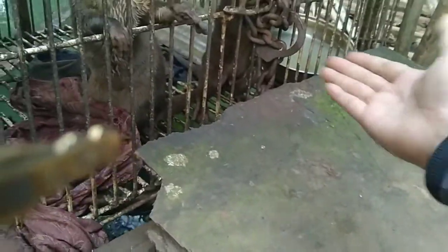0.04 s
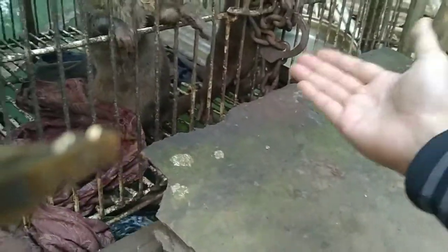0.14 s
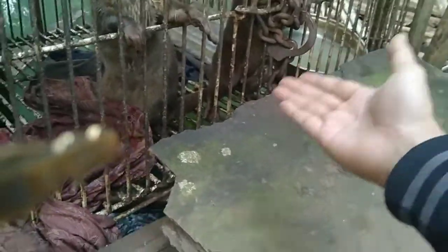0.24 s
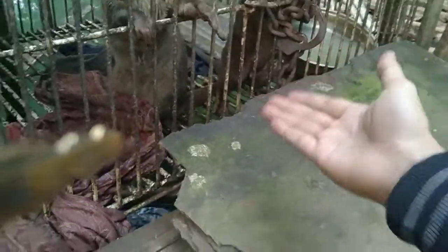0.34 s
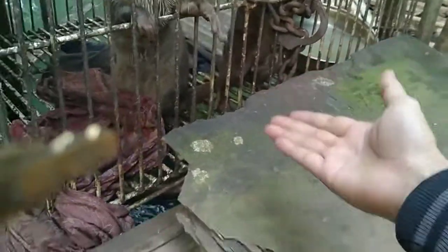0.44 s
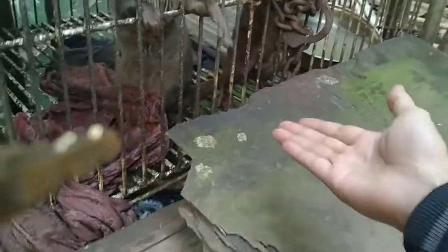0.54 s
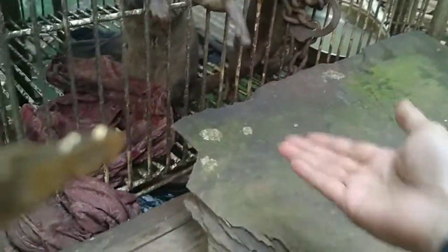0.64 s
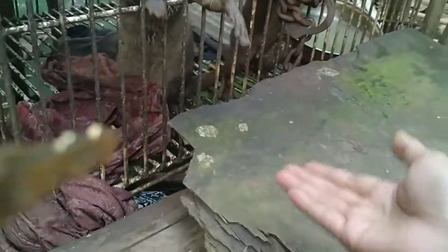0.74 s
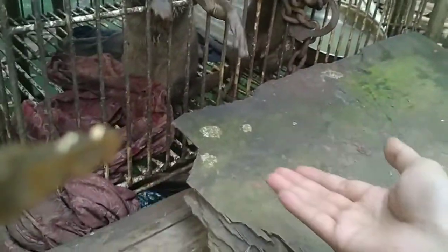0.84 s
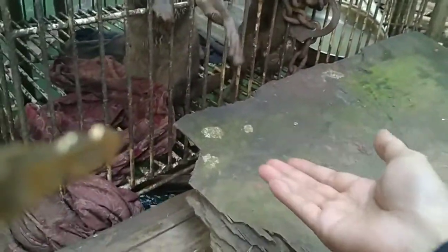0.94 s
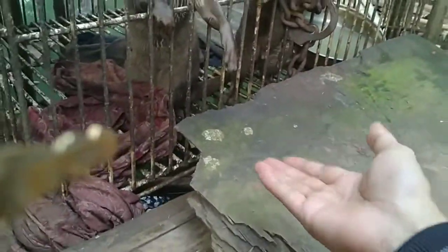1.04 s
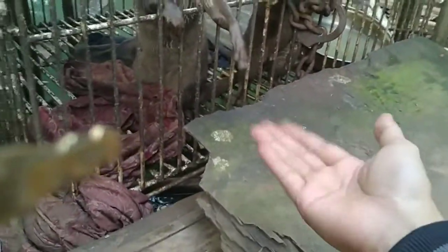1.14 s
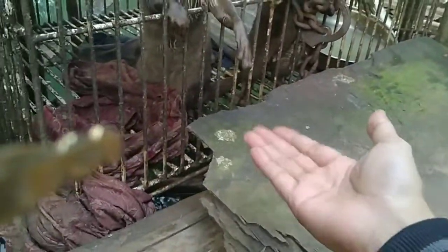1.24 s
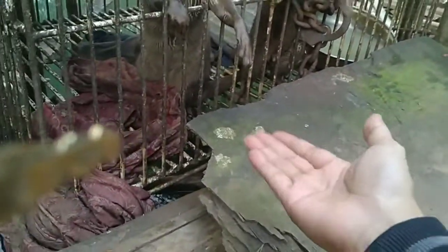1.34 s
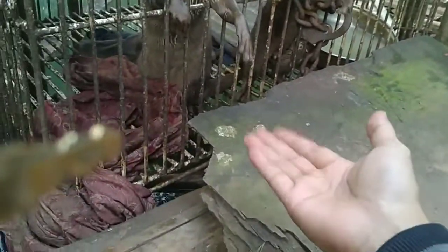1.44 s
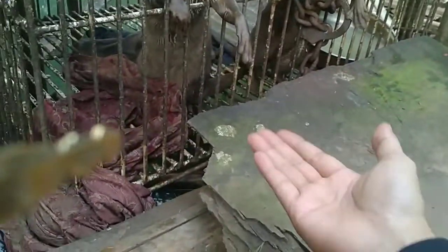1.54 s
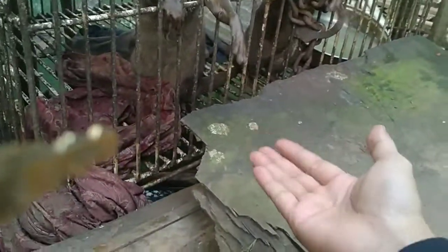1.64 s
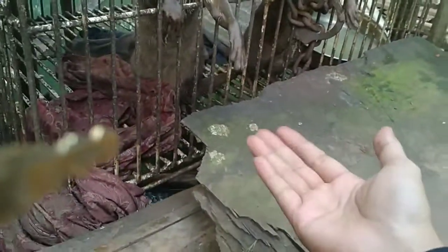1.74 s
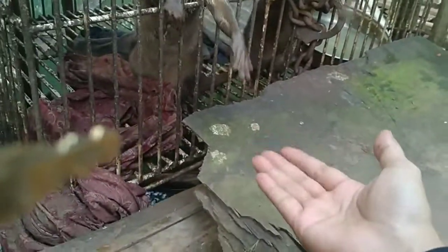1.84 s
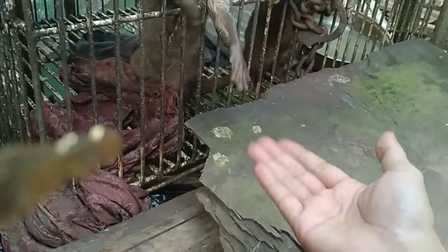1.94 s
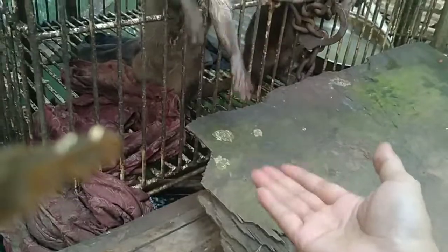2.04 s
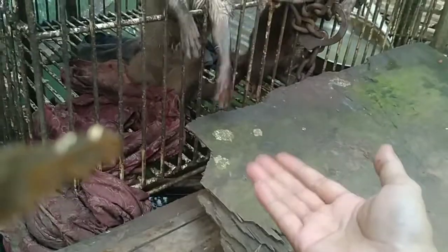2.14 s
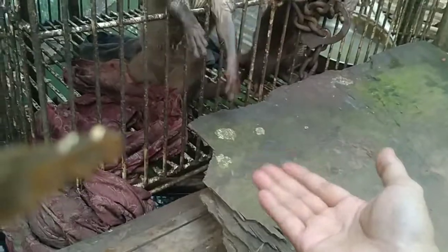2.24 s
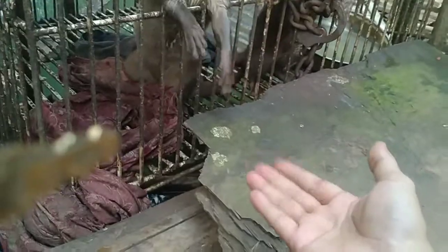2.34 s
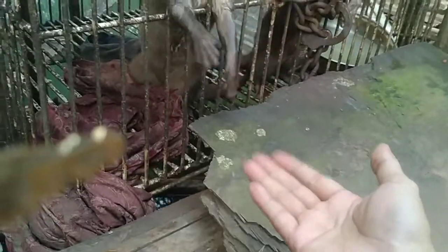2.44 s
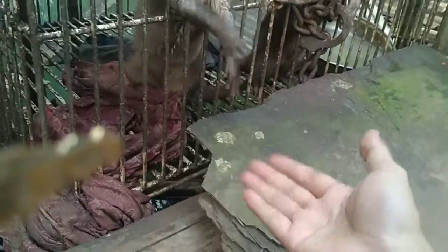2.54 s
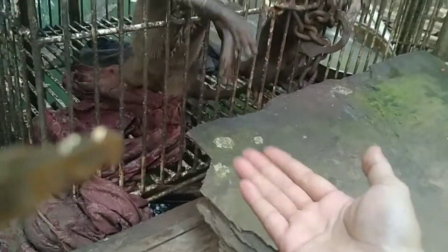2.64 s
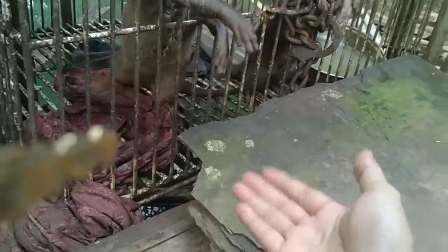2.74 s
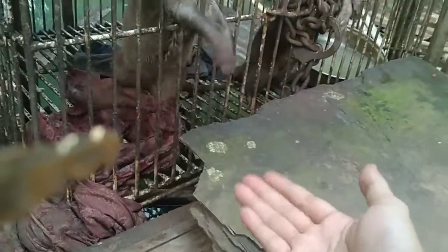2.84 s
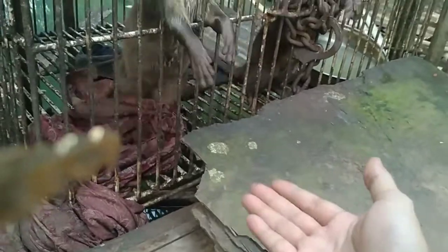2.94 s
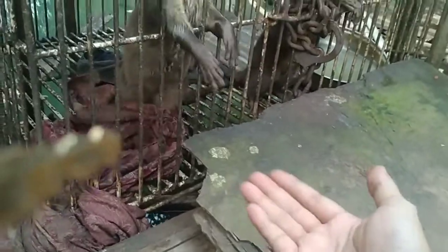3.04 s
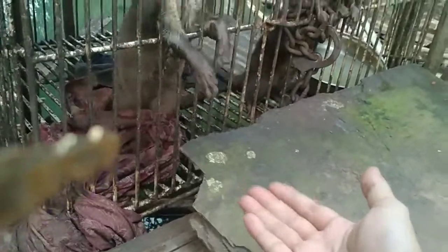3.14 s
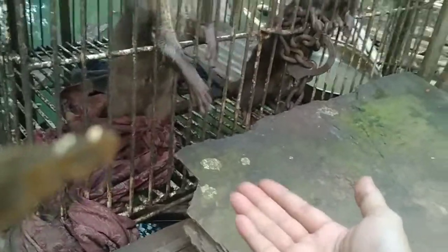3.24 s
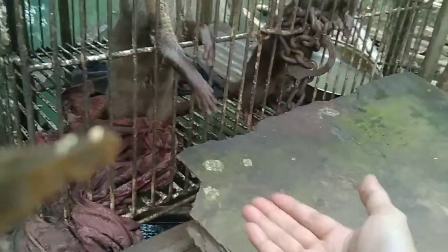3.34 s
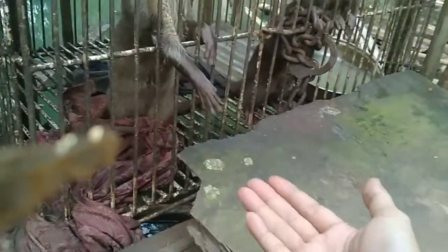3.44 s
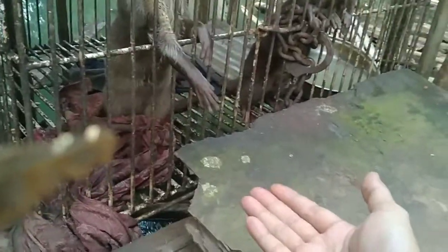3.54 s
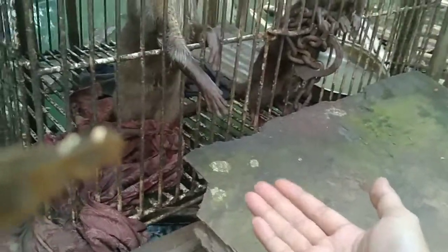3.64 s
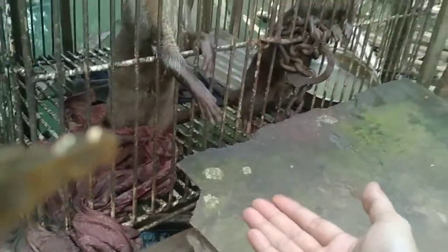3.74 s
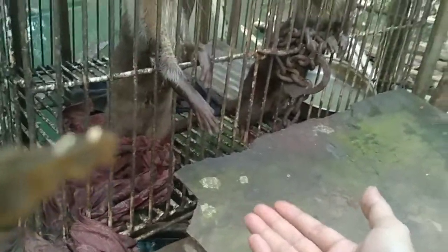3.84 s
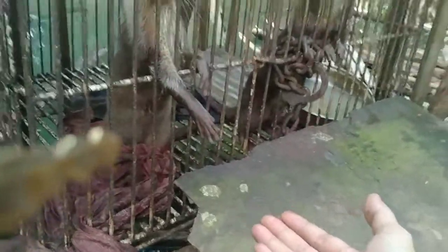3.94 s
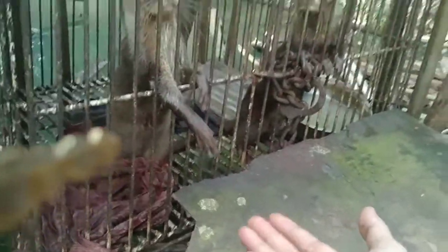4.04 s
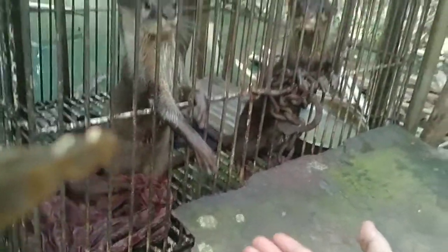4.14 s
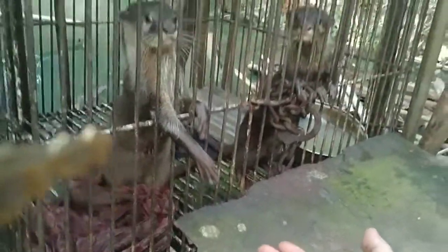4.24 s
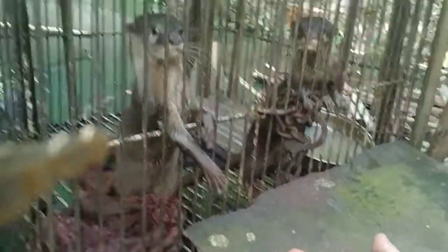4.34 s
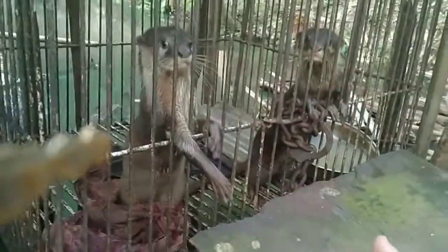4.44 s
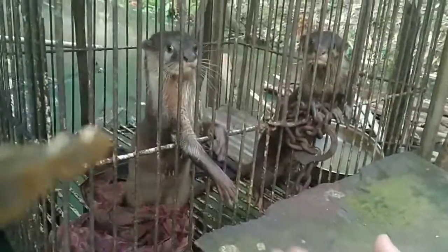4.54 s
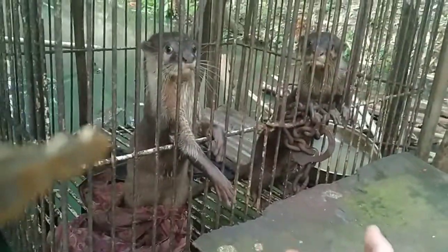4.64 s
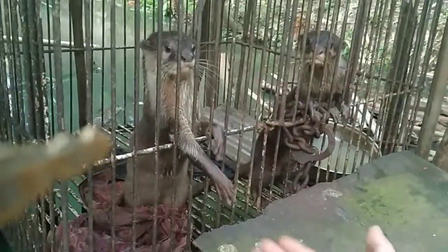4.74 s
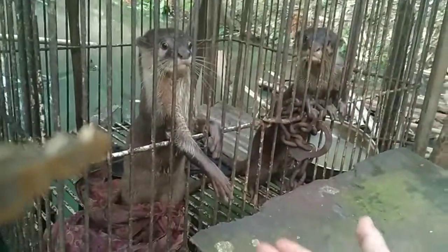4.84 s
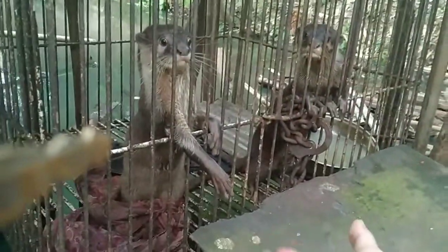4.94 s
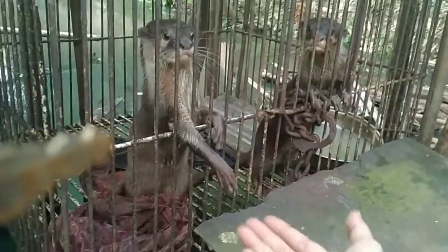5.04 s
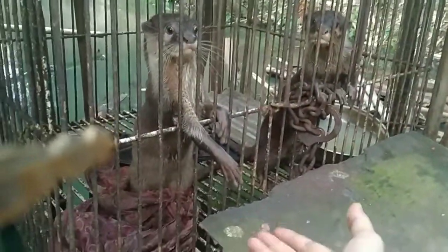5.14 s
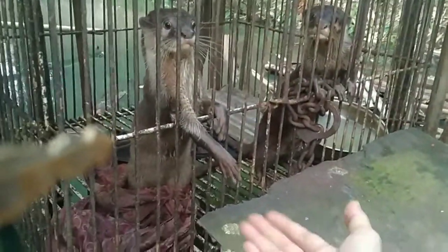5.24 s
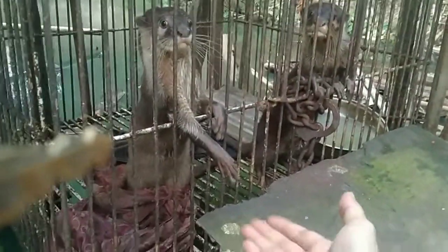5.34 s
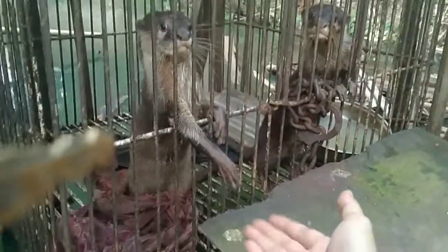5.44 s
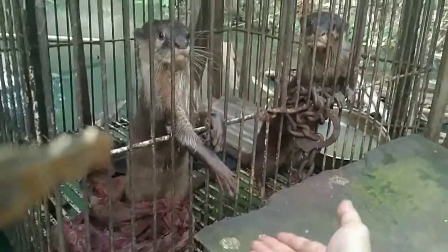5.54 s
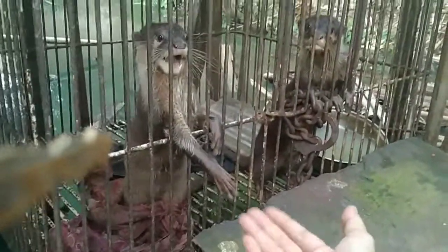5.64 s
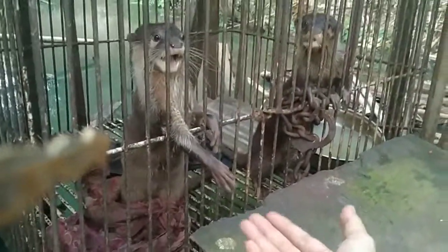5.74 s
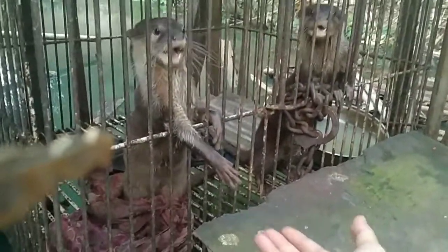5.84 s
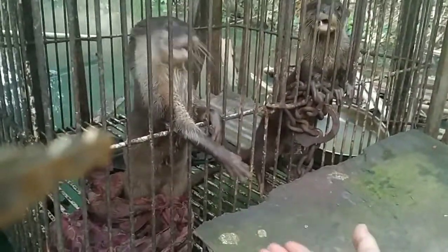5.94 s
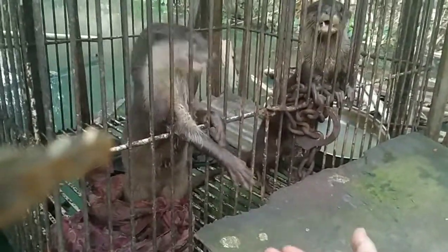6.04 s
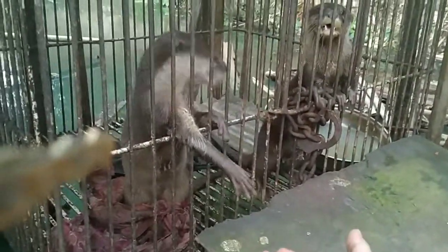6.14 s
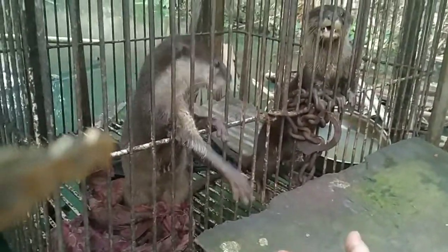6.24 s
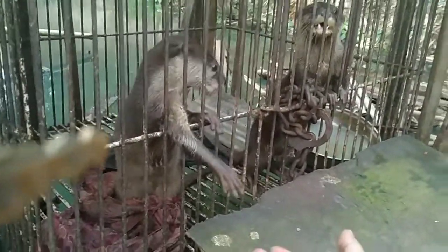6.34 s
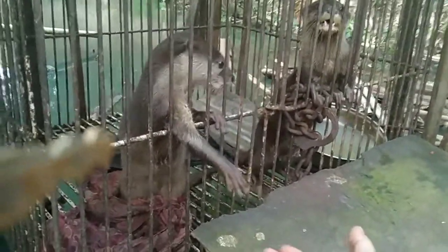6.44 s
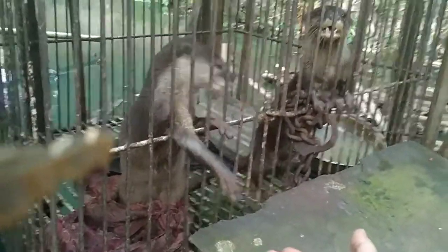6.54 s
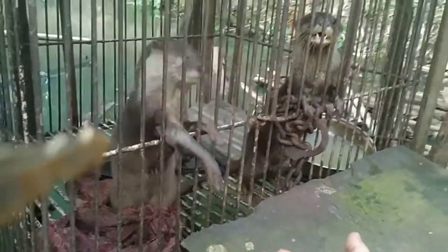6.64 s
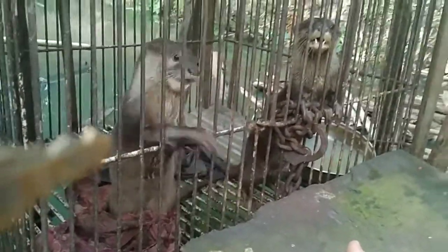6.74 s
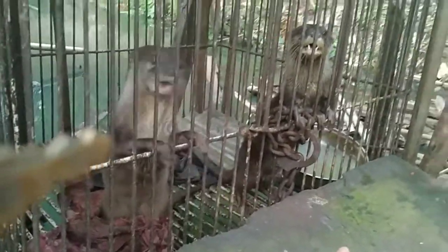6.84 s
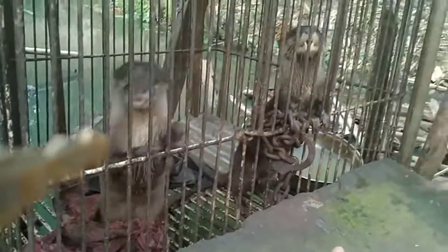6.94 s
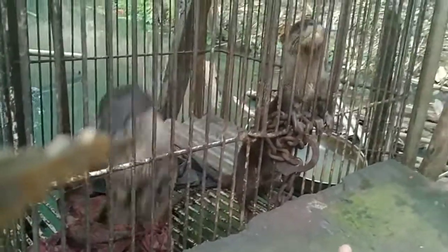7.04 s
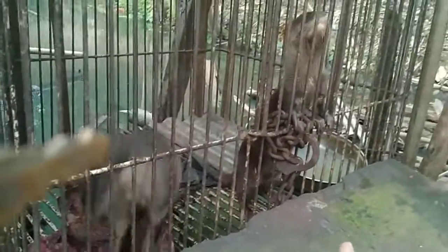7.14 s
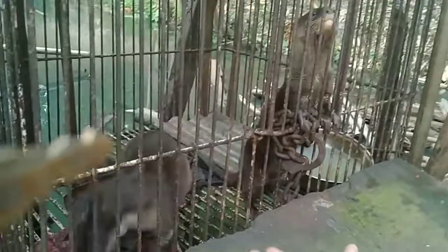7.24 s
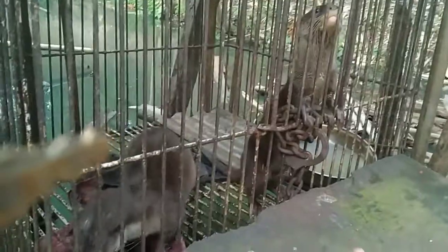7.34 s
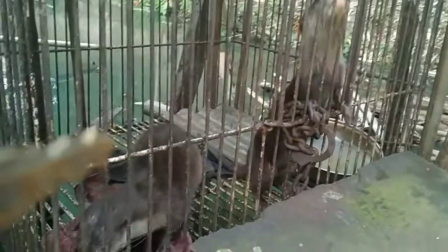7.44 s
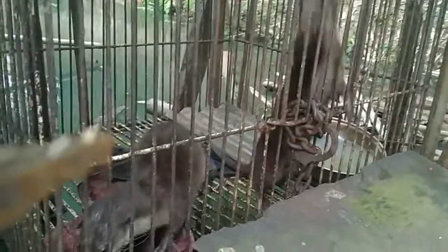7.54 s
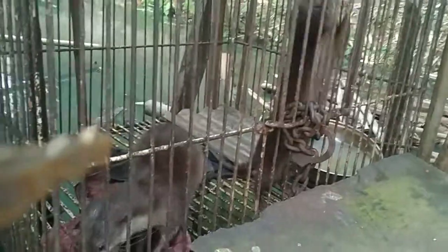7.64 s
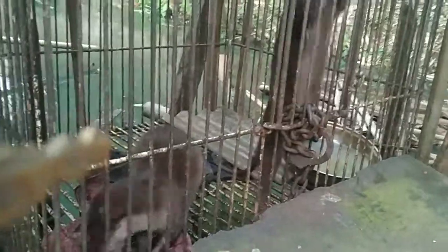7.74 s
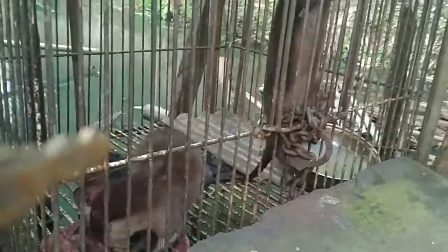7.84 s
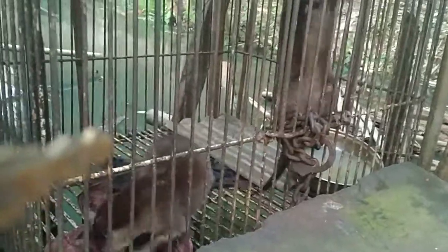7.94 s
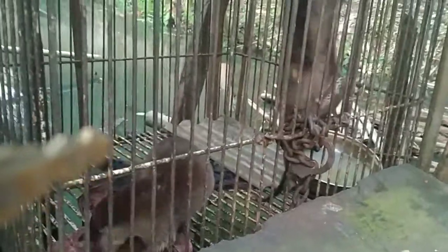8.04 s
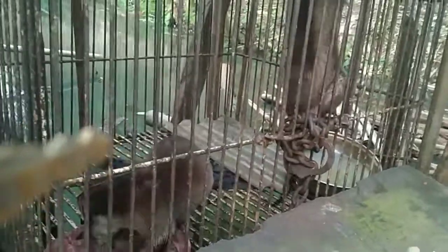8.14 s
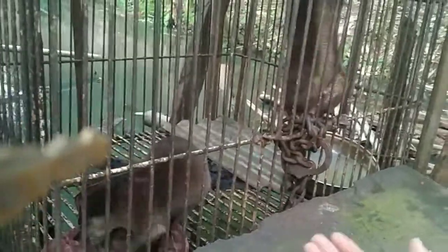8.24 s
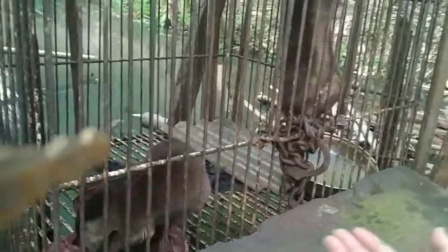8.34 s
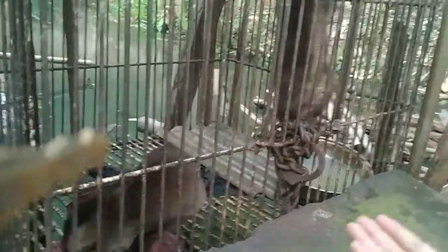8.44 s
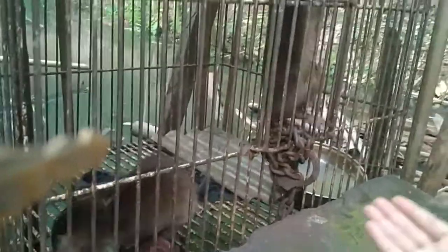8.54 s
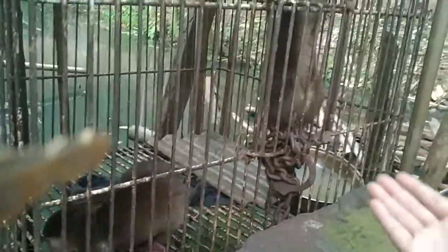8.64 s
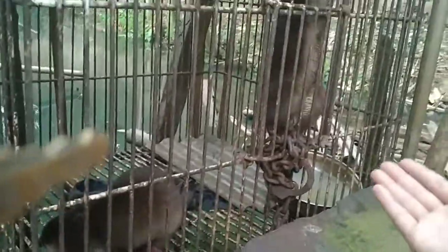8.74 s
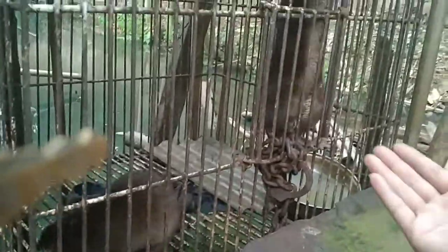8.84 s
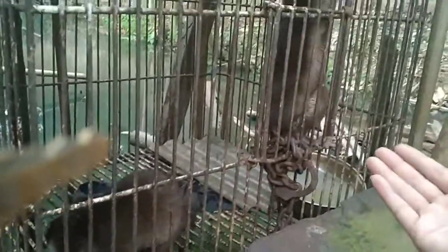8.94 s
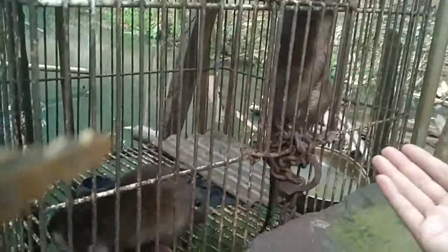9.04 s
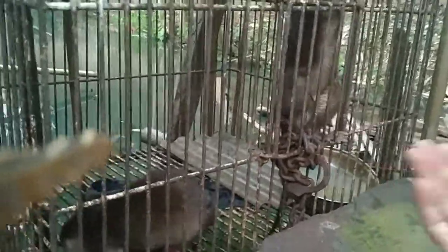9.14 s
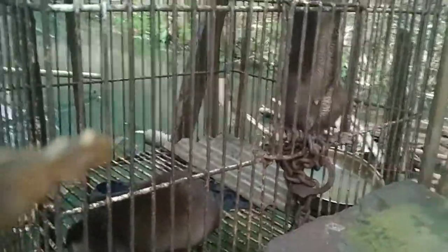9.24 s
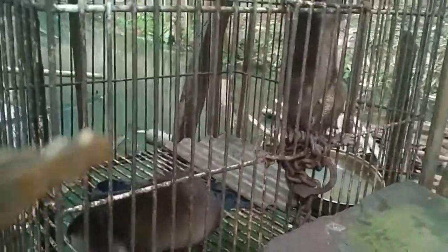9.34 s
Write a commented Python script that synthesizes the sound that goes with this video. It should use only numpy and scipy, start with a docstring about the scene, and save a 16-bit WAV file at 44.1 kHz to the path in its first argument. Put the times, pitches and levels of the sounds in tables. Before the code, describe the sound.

Two caged otters squeal close to the microphone outdoors. Shrill, slightly hoarse calls, most opening with a short whistle, lead to one long wavering squeal. After a quiet gap with faint distant chirps and a light claw tap on the bars, more squeals follow with softer, lower whines. A quick falling whistle and a small snort come near the end, over a low rumble and thin hiss.

```python
"""Shrill squeals, most opening with a whistle, come from two caged otters outdoors, close by and in mono.
Softer low whines, falling notes, a snort, a claw tap and far chirps sound over a low rumble and thin hiss.
Squeals and whines follow the source-filter principle: vocal-fold pulses excite the resonances of a throat.
Whistles and chirps are gliding tones, breath is filtered noise, and walls and cages add a short echo."""
import sys
import numpy as np
from scipy import signal
from scipy.fft import rfft, irfft
from scipy.io import wavfile
from scipy.ndimage import uniform_filter1d

SR = 44100
rng = np.random.default_rng(int(sys.argv[2]) if len(sys.argv) > 2 else 0)


def unload_audio(sound):
    """Save the sound as a 16-bit wav file, at the path given as the first command line argument."""
    columns = np.transpose(np.atleast_2d(sound))
    # keep every value between -1 and 1, then stretch to whole-number steps
    steps = np.round(np.clip(columns, -1, 1) * 32767)
    wavfile.write(sys.argv[1], SR, steps.astype(np.int16))


N = 413658
BAND_LIMIT_HZ = 15950

# resonances of the open throat: frequency_hz, gain_db
OPEN_THROAT = [(700, -36.5), (1150, -21), (1650, -28.5), (2300, -9), (3400, -0.5), (4600, 2.5), (5250, -12),
               (5800, -10.5), (7000, -11.5), (8200, -3.5), (10400, -21), (13000, -19), (15900, -16.5)]


def squeal(contour, overshoot_hz, settle_s, base_rasp_db, hum_db):
    """Source and filter: a high voice cracks and glides down to pitch; the mouth's opening colours it."""
    # hoarse stretches: start_s, end_s, first_db, last_db
    hoarse_spans = [(0.672, 0.926, -13.5, -8), (1.727, 1.824, -10, -35), (2.138, 2.232, -21, -20)]
    # mouth and timbre: time_s, opening_share, second_partial_db, treble_db
    mouth_shapes = [(.02, 0.25, -4.5, 1), (.6, 0.64, 0, -2), (.72, 0.25, -13.5, 8.5), (.9, 0.24, -10, 1.5),
                    (1.7, 1, 0, 1), (1.95, 0.46, -2.5, 4.5), (2.25, 0.53, -8, 2.5), (2.42, 1, 5.5, -1),
                    (2.78, 1, 0.5, -0.5), (2.97, 0.29, 9, 3.5), (5.74, 1, -4, -3), (6.0, 0.45, -7.5, -2),
                    (6.1, 0.26, -2.5, -5.5), (6.9, 0.78, 7, -4)]
    # change of resonance as the mouth narrows: frequency_hz, gain_db
    narrowing = [(1150, 2), (2850, 16.5), (3400, 12.5), (4600, -3), (8200, -11.5)]
    crack_s, close_s, gulp_s = .0023, .018, .005
    t, hz, level_db = curves(contour)
    age, to_end = t - t[0], t[-1] - t
    closing = np.clip(1 - to_end / close_s, 0, 1)
    hz = hz + overshoot_hz * (np.exp(-(age / settle_s) ** 1.5) + .8 * np.exp(-age / crack_s))
    hz *= 1 - .06 * np.minimum(closing * 5, 1)  # the pitch drops as the mouth shuts
    gulp = np.exp(-((to_end - close_s - gulp_s) / gulp_s) ** 2)
    level_db = level_db - 4 * gulp - 19 * closing + drift(len(t), span=330)
    rasp_db = np.full(len(t), float(base_rasp_db))
    for start, end, first_db, last_db in hoarse_spans:
        rasp_db = np.maximum(rasp_db, np.interp(t, [start, end], [first_db, last_db], -99, -99))
    rasp_db = uniform_filter1d(rasp_db, size=600)
    onset_rasp_db = (overshoot_hz > 1) * 13 * np.exp(-age / .03)  # the voice frays as it starts and stops
    rasp_db = np.minimum(rasp_db + (-4 - rasp_db) * closing + onset_rasp_db, 0)
    pair_db = np.where((t > 1.785) & (t < 1.824), -8.5, -99)  # brief period doubling
    _, opening, second_db, treble_db = curves(mouth_shapes, t)
    voice = vocal_folds(hz, rasp_db, pair_db, wobble=.0047, fade_db=4.2,
                        second_db=second_db, treble_db=treble_db)
    narrow_throat = [(f, db + spectrum_at(narrowing, f)) for f, db in OPEN_THROAT]
    call = opening * vocal_tract(OPEN_THROAT, *voice) + (1 - opening) * vocal_tract(narrow_throat, *voice)
    shutting = np.exp(-((to_end - .015) / .0085) ** 2)  # the closing mouth hums the fundamental
    return gain_of(level_db) * call + gain_of(hum_db) * shutting * np.sin(phase_of(hz))


def vocal_folds(hz, rasp_db, pair_db, wobble, fade_db, second_db=0, treble_db=0):
    """Harmonic pulse train: jitter and shimmer roughen it, and strong-weak pairs add a subharmonic."""
    waver = drift(len(hz), span=230) + .4 * drift(len(hz), span=40)
    turns = np.cumsum(hz * (1 + wobble * waver)) / SR
    cycle = np.round(turns).astype(int)
    shimmer, jitter = np.diff(rng.standard_normal((cycle[-1] + 3, 2)), axis=0).T / np.sqrt(2)
    jittered = turns + .03 * gain_of(rasp_db) * np.interp(turns, np.arange(len(jitter)), jitter)
    k = np.arange(1, 32)[:, None]
    partials_hz = k * hz
    fading = np.array([drift(len(hz) // 64 + 1, span=22) for _ in k]).repeat(64, axis=1)[:, :len(hz)]
    fading_db = np.minimum(k * .7, fade_db) * fading  # overtones come and go as the head turns
    sizes = gain_of(fading_db + second_db * (k == 2) + treble_db * (abs(partials_hz - 7500) < 2500))
    sizes = uniform_filter1d(sizes, size=200)
    sizes *= np.clip((BAND_LIMIT_HZ + 1000 - partials_hz) / 500, 0, 1)
    pulses = (sizes * np.cos(2 * np.pi * k * jittered)).sum(0)
    pulses *= 1 + gain_of(rasp_db) * shimmer[cycle] + gain_of(pair_db) * (-1.) ** cycle
    return pulses, partials_hz, sizes


def vocal_tract(throat, pulses, partials_hz, sizes):
    """Formant filtering, scaled so that the level stays even as pitch and overtones move."""
    power = ((sizes * gain_of(spectrum_at(throat, partials_hz))) ** 2).sum(0) / 2
    return resonate(pulses, throat) / np.sqrt(power)


def whistle(hz, first_db, second_db):
    """A near-pure tone with three overtones flutters by random frequency and amplitude modulation."""
    phase = phase_of(hz * (1 + .01 * drift(len(hz), span=75)))
    tone = gain_of(first_db) * np.sin(phase) + gain_of(second_db) * np.sin(2 * phase)
    tone += gain_of(second_db - 20) * np.sin(3 * phase) * (3 * hz < BAND_LIMIT_HZ)
    tone += gain_of(second_db - 10) * np.sin(4 * phase) * (4 * hz < BAND_LIMIT_HZ)
    return np.sqrt(2) * tone * gain_of(1.3 * drift(len(hz), span=120))


def opening_whistle(length, overshoot_hz, first_hz, last_hz, db, sag_db, second_db, broken_s):
    """Pitch break: a whistle snaps onto its note, brightens, droops and frays, then jumps down a step."""
    rise_s, overshoot_s, plunge_s, broken_hz = .0043, .0042, .017, 2900
    t = np.arange(0, length, 1 / SR)
    plunge = np.clip(1 - (length - broken_s - t) / plunge_s, 0, 1) ** 2
    hz = np.linspace(first_hz, last_hz, len(t)) + overshoot_hz * np.exp(-t / overshoot_s)
    hz *= 1 - .21 * plunge
    hz = uniform_filter1d(np.where(t > length - broken_s, broken_hz, hz), size=50)
    hiss = gain_of(db - 32 + 10 * plunge) * unit_rms(resonate(rng.standard_normal(len(t)), OPEN_THROAT))
    swell_db = 8 * (np.minimum(t / (length - plunge_s), 1) - 1 - 2 * plunge)
    fray_db = 3.5 * plunge * drift(len(t), span=40)
    tone = whistle(hz, db + sag_db * t / length + fray_db, second_db + swell_db)
    return np.minimum(t / rise_s, 1) * (tone + hiss)


def whine(start, length, first_hz, turn_hz, last_hz, turn, db, slope_db,
          rasp_db, chest_db, ring_db, treble_db):
    """Mixed excitation: a low soft voice that bends once shares the throat's resonances with breath."""
    # resonances of the whining throat: frequency_hz, gain_db
    soft_throat = [(400, -62), (580, -16), (1150, -15.5), (1750, -14), (2250, -8.5), (2800, 9), (3650, -14),
                   (4150, -9), (4900, -36), (5750, -12.5), (6900, -28), (8400, -15.5), (9600, -30.5),
                   (15900, -38)]
    # catches in the voice, where pitch and level dip: time_s
    catch_times = [6.408, 6.435, 6.478, 6.575, 6.614, 6.674]
    rise_s, fall_s, catch_s = .031, .03, .009
    t = np.arange(0, length, 1 / SR)
    after_turn = np.clip((t / length - turn) / (1 - turn), 0, 1)
    hz = np.interp(t, [0, turn * length], [first_hz, turn_hz])
    hz += (last_hz - turn_hz) * (1 - (1 - after_turn) ** 1.8)
    catch = sum(np.exp(-((start + t - s) / catch_s) ** 2) for s in catch_times)
    hz *= 1 + .011 * drift(len(t), span=300) - .055 * catch
    level = gain_of(db - 4 * catch + slope_db * t / length)
    level *= np.clip(np.minimum(t / rise_s, (length - t) / fall_s), 0, 1)
    rasp_db = rasp_db + 5.5 * (.5 - t / length)  # the hoarseness clears along the whine
    throat = [(f, gain_db + chest_db * (f < 2000) + ring_db * (2500 < f < 3200) + treble_db * (f > 4000))
              for f, gain_db in soft_throat]
    source = vocal_folds(hz, rasp_db, pair_db=-59, wobble=.1 * gain_of(rasp_db), fade_db=1)
    return level * (vocal_tract(throat, *source) + gain_of(rasp_db) * breath(len(t), throat))


def falling_note(length, first_hz, last_hz, loudest, db, second_db):
    """A husky whistle falls and swells once; at low pitch, modulation breaks it into stepped bursts."""
    stutter_hz, stutter_below_hz = 88, 4100
    progress = np.linspace(0, 1, round(length * SR))
    swell_db = np.interp(progress, [0, loudest, 1], [-9, 0, -7.5])
    burst_phase = np.pi * stutter_hz * length * (progress - loudest)
    hz = first_hz + (last_hz - first_hz) * progress
    broken = np.clip((stutter_below_hz - hz) / 1000, 0, 1)
    hz *= 1 + .035 * broken * np.sin(2 * burst_phase)  # each burst clings to its pitch
    swell_db += -15 * broken * np.sin(burst_phase) ** 4 + 2 * progress * drift(len(hz), span=76)
    hiss = gain_of(db - 21) * unit_rms(resonate(rng.standard_normal(len(hz)), OPEN_THROAT))
    return gain_of(swell_db) * (whistle(hz, db, second_db) + hiss)


def breath(count, throat):
    """Turbulence: bright noise takes on the resonances of a throat."""
    return unit_rms(resonate(np.diff(rng.standard_normal(count + 1)), throat))


def sigh(db):
    """Spent air hisses through the open throat after a squeal, with exponential decay."""
    t = np.arange(9000) / SR
    return gain_of(db - 170 * t) * breath(len(t), OPEN_THROAT)


def puff(db):
    """Pressure pulse: breath hits the microphone as a blunt pop with a slower thump behind it."""
    pop_s, thump_s = .0005, .004
    age = np.maximum(np.arange(2500) / SR - .003, 0) / np.array([[pop_s], [thump_s]])
    return gain_of(db) * (np.e * age * np.exp(-age) * (1 - age / 2)).sum(0)


def snort(length, db):
    """Sputtering turbulence excites the nose, whose resonances sink as the nostrils relax."""
    # nasal resonances before the slowed playback lowers them: frequency_hz, gain_db
    nose = [(2200, -21), (3200, -1), (3800, 1.5), (4500, -25), (6400, -0.5), (7500, -9), (9000, -10.5)]
    rise_s, fall_db_per_s = .01, 310
    t = np.arange(0, length, 1 / SR)
    air = resonate(rng.standard_normal(len(t)) * gain_of(1.8 * drift(len(t), span=32)), nose)
    slowing_index = np.cumsum(.72 + .27 * np.exp(-(t / .024) ** 2))
    level = np.clip(.5 + t / rise_s, 0, 1) * gain_of(db - fall_db_per_s * np.maximum(t - rise_s, 0))
    return level * unit_rms(np.interp(slowing_index, np.arange(len(t)), air))


def claw_tap(db):
    """Damped free vibration: a claw sets the cage bars ringing."""
    # mode of the bars: frequency_hz, t60_s
    bar_modes = [(1670, 0.11)]
    t = np.arange(6000) / SR
    return sum(gain_of(db - 60 * t / t60) * np.sin(2 * np.pi * hz * t) for hz, t60 in bar_modes)


def chirp(length, first_hz, last_hz, db):
    """A sine glide with one pitch jump swells late; random modulation makes it husky."""
    progress = np.linspace(0, 1, round(length * SR))
    glide = .75 * progress + .25 * (progress > .4)
    hz = first_hz * (last_hz / first_hz) ** glide * (1 + .03 * drift(len(glide), span=18))
    swell = np.sin(np.pi * progress ** 1.4) * gain_of(db + 3 * drift(len(hz), span=80))
    return swell * np.sin(phase_of(hz))


def yard_echo(x, t60_s=.2):
    """Reverberation: sparse reflections of random sign from walls and cages decay exponentially."""
    reflections = np.zeros(20000)
    slots = np.arange(200, 19980, 20)
    reflections[slots + rng.integers(0, 20, len(slots))] = rng.choice([-1., 1.], len(slots))
    tail = reflections * gain_of(-60 * np.arange(len(reflections)) / SR / t60_s)
    return signal.oaconvolve(x, tail / np.linalg.norm(tail))[:N]


def background():
    """Broadband outdoor noise lies under three narrow bands: a wavering hum, a far drone, an insect."""
    # spectrum of the outdoor noise: frequency_hz, relative_db
    air_spectrum = [(66, -3), (488, -19.5), (1040, -18.5), (2100, -24.5), (4350, -36.5), (5250, -42),
                    (8310, -36), (11500, -44.5), (15900, -35)]
    # levels of the low rumble: time_s, hum_db, drone_db
    rumble_levels = [(3.1, -53, -63.5), (6.1, -45.5, -68), (7.9, -47.5, -67), (8.8, -48.5, -54)]
    frames, hz = N // 256 + 5, np.fft.rfftfreq(1024, 1 / SR)
    real, imag, patches = rng.standard_normal((frames, 513, 3)).T
    patches_db = unit_rms(uniform_filter1d(uniform_filter1d(patches, 8, 0), 20, 1))
    spectra = (real + 1j * imag) * gain_of(spectrum_at(air_spectrum, hz)[:, None] + patches_db)
    air = gain_of(-49) * unit_rms(signal.istft(spectra, nperseg=1024, noverlap=768)[1][:N])
    t, hum_db, drone_db = curves(rumble_levels, np.arange(N) / SR)
    hum = gain_of(hum_db) * band_noise(hz=58, width_hz=6)
    drone = gain_of(drone_db) * band_noise(hz=190, width_hz=120)
    insect = gain_of(-74) * (t > 3.5) * (t < 5.2) * band_noise(hz=4294, width_hz=84)
    return air + hum + drone + insect


def band_noise(hz, width_hz):
    """Narrowband noise, heard as a fuzzy tone."""
    f = np.fft.rfftfreq(N, 1 / SR)
    return unit_rms(irfft(rfft(rng.standard_normal(N)) / (1 + ((f - hz) / width_hz) ** 2), N))


def resonate(x, spectrum):
    """Minimum-phase filtering imposes a spectrum as a causal resonator would."""
    log_gain = np.log(gain_of(spectrum_at(spectrum, abs(np.fft.fftfreq(2048, 1 / SR)))))
    response = np.fft.ifft(np.exp(np.conj(signal.hilbert(log_gain)))).real[:1024]
    return signal.oaconvolve(x, response)[:len(x)]


def drift(count, span):
    """Low-pass noise of rms 1, correlated over about span samples."""
    return unit_rms(uniform_filter1d(uniform_filter1d(rng.standard_normal(count), span), span))


def phase_of(hz):
    """Phase in radians is the integral of frequency."""
    return 2 * np.pi * np.cumsum(hz) / SR


def gain_of(db):
    """Decibels to an amplitude ratio."""
    return 10 ** (np.asarray(db) / 20)


def unit_rms(x):
    """Normalises to rms 1."""
    return x / np.sqrt(np.mean(x ** 2) + 1e-20)


def spectrum_at(spectrum, hz):
    """Interpolates a spectrum on a log-frequency axis."""
    f, db = np.transpose(spectrum)
    return np.interp(np.log(hz + 1), np.log(f + 1), db)


def curves(rows, t=None):
    """Interpolates a table into sample times and control curves."""
    times, *controls = np.transpose(rows)
    t = np.arange(times[0], times[-1], 1 / SR) if t is None else t
    return (t, *(np.interp(t, times, control) for control in controls))


def add(mix, start_s, sound):
    """Superposes a sound on the mix, with short fades."""
    part = mix[round(start_s * SR):][:len(sound)]
    part += (sound * signal.windows.tukey(len(sound), min(1, 200 / len(sound))))[:len(part)]


def scene():
    """Direct-to-reverberant ratio: near calls are mostly dry; those turned away or far off echo more."""
    # held voice, one list for each squeal: time_s, pitch_hz, level_db
    contours = [
        [(0.0, 1097, -7.5), (0.014, 1128, -11.5), (0.035, 1105, -16.5)],
        [(0.574, 1140, -19), (0.674, 1189, -18), (0.918, 1143, -15)],
        [(1.627, 1196, -19.5), (1.777, 1228, -21), (1.9, 1184, -13), (2.05, 1161, -13), (2.105, 1177, -18.5),
         (2.125, 1157, -17), (2.34, 1120, -16), (2.395, 1148, -17.5), (2.52, 1115, -18.5), (2.8, 1162, -18.5),
         (2.88, 954, -18.5), (2.929, 945, -23), (2.965, 959, -18), (3.004, 950, -12)],
        [(5.661, 1417, -16.5), (5.727, 1370, -18.5), (5.79, 1225, -25), (5.846, 1160, -17), (5.92, 1155, -19.5),
         (5.98, 1057, -12.5), (6.058, 1111, -19.5), (6.09, 1088, -18.5), (6.15, 1060, -18.5)],
        [(6.801, 1293, -16.5), (6.91, 1328, -20), (6.968, 1247, -36.5), (7.0, 1356, -23.5)],
    ]
    # manner of each squeal: overshoot_hz, settle_s, base_rasp_db, hum_db
    manners = [(0, .05, -16.5, -23), (550, 0.062, -28.5, -33), (722, .07, -39.5, -48),
               (323, 0.013, -36, -32), (602, 0.042, -20, -46)]
    # whines: start_s, length_s, first_hz, turn_hz, last_hz, turn_share, level_db, slope_db,
    # rasp_db, chest_db, nasal_ring_db, treble_db
    whines = [(0.12, 0.18, 550, 598, 630, 0.61, -37, 1.5, -24, 5, -17, -7),
              (1.024, 0.18, 574, 621, 569, 0.38, -35.5, -6.5, -27, 12.5, -5.5, -0.5),
              (5.783, 0.18, 1608, 1313, 833, 0.21, -32, -12, -17, 4, -1, 7),
              (6.184, 0.1, 743, 703, 647, 0.43, -39.5, 4, -14, -3.5, -5, -8),
              (6.247, 0.55, 597, 551, 564, 0.17, -31, 4.5, -14, 2, 0, 5),
              (6.823, 0.17, 530.5, 594, 609, 0.97, -29, 4, -16, 6.5, 10, 1),
              (7.402, 0.26, 684, 761, 660, 0.15, -26.5, -13, -20.5, -12.5, -26, -7),
              (8.487, 0.067, 640, 606, 577, 0.59, -41.5, -7, -20.5, 17, 1, -1)]
    # whistles before squeals: start_s, length_s, overshoot_hz, first_hz, last_hz, level_db, sag_db,
    # second_partial_db, broken_s
    whistles = [(.512, 0.063, 8.8, 4250, 4370, -19.5, -2.5, -14, 0.0057),
                (1.576, 0.059, 990, 4470, 4170, -11, -10, -17.5, 0.0018),
                (5.633, 0.034, 700, 4400, 3890, -9, -15.5, -20, 0.0018),
                (6.749, 0.059, 330, 4650, 3880, -16, -4, -17, 0.0093)]
    # bursts of the snort: start_s, length_s, level_db
    snorts = [(8.687, 0.15, -31), (8.795, .06, -43)]
    # claw on the bars: start_s, peak_db
    taps = [(4.451, -35.5)]
    # puffs as the voice breaks: start_s, level_db
    puffs = [(.554, -25), (1.617, -28), (5.644, -26)]
    # lone whistled notes: start_s, length_s, first_hz, last_hz, loudest_share, level_db, second_partial_db
    notes = [(7.727, 0.045, 4560, 3230, 0.45, -19.5, -35), (7.765, 0.044, 2900, 1950, 0.24, -17, -47),
             (9.014, 0.05, 5800, 2880, 0.11, -51, -61), (9.047, 0.033, 2890, 1316, 0.24, -37, -82),
             (9.319, 0.063, 5570, 3430, 0.85, -45, -54.5)]
    # far chirps: start_s, length_s, first_hz, last_hz, level_db
    chirps = [(3.117, 0.046, 2150, 2194, -42.5), (3.172, 0.072, 3720, 3145, -47),
              (3.918, 0.14, 4800, 2900, -51), (5.061, 0.12, 4676, 2750, -52),
              (5.241, 0.067, 2740, 2040, -62), (7.646, 0.076, 4080, 2870, -50),
              (8.422, 0.12, 4500, 2930, -52.5)]
    near, aside, far = np.zeros((3, N))
    for contour, manner in zip(contours, manners):
        add(near, contour[0][0], squeal(contour, *manner))
        end_s, _, end_db = contour[-1]
        add(near, end_s - .01, sigh(end_db - 29))
    for row in whines:
        add(near, row[0], whine(*row))
    for mix, source, events in ((near, opening_whistle, whistles), (near, snort, snorts),
                                (near, claw_tap, taps), (near, puff, puffs),
                                (aside, falling_note, notes), (far, chirp, chirps)):
        for start_s, *settings in events:
            add(mix, start_s, source(*settings))
    echo = yard_echo(gain_of(-21.5) * near + gain_of(-15) * aside + far)
    mono = near + aside + far + echo + background()
    return np.array([mono, mono])


def record(dry):
    """Band limiting: the recorder's low-pass filter removes the highest treble."""
    low_pass = signal.firwin(511, BAND_LIMIT_HZ, window=("kaiser", 9), fs=SR)
    return signal.oaconvolve(dry, low_pass[None], "same")


dry = scene()
out = record(dry)
unload_audio(out)
```